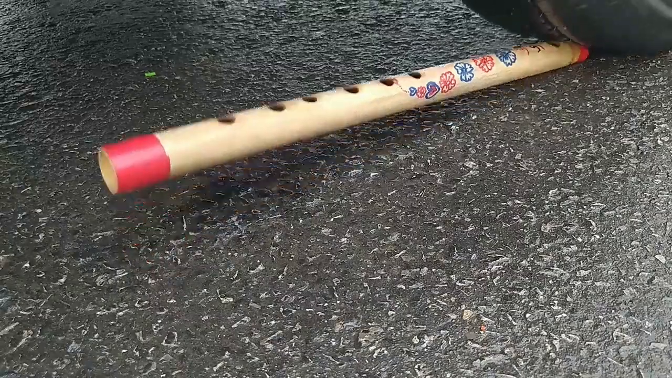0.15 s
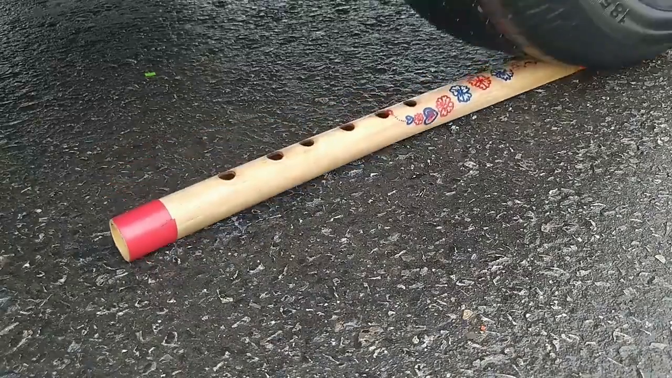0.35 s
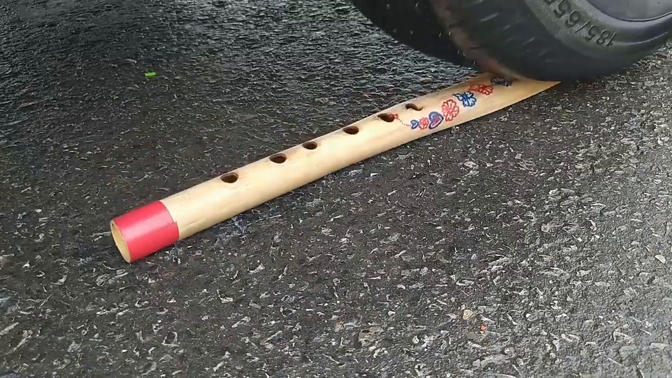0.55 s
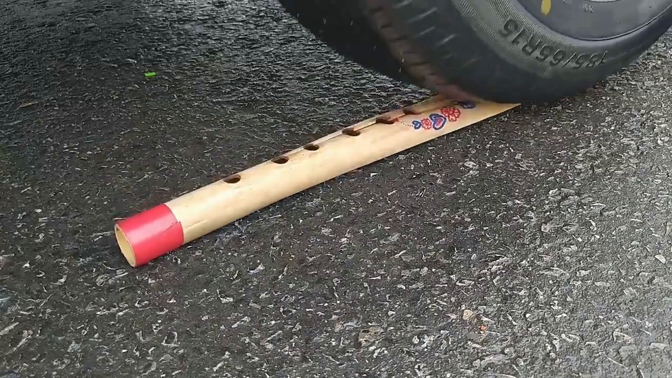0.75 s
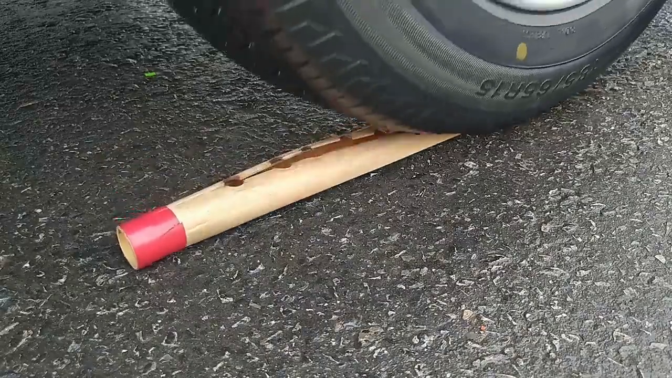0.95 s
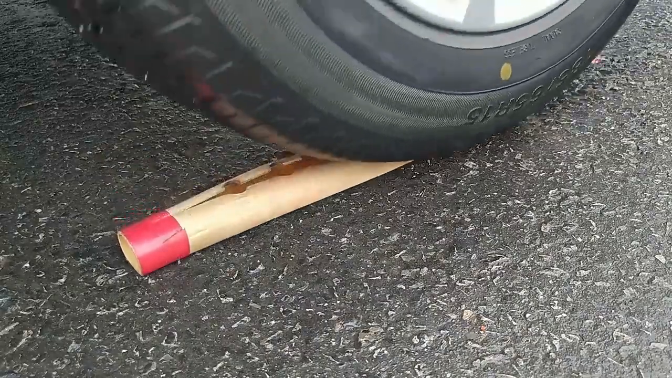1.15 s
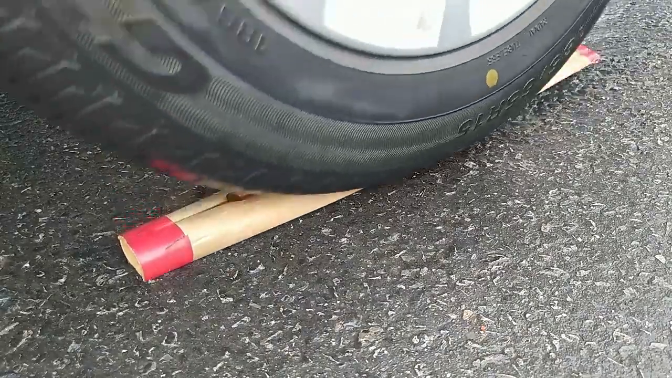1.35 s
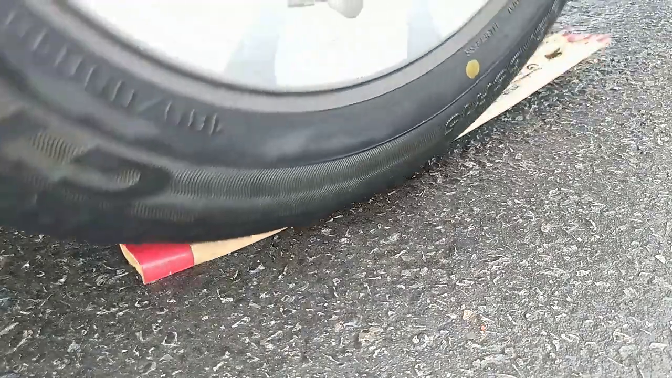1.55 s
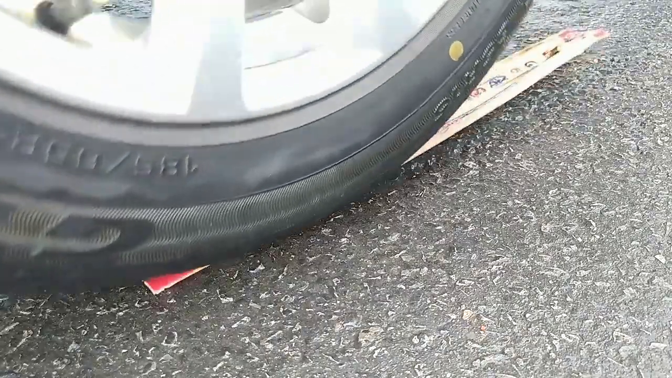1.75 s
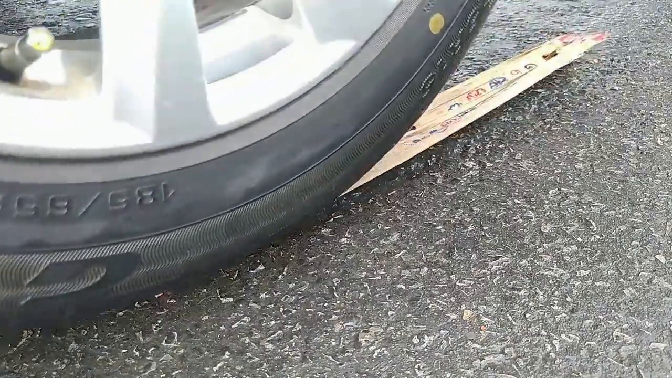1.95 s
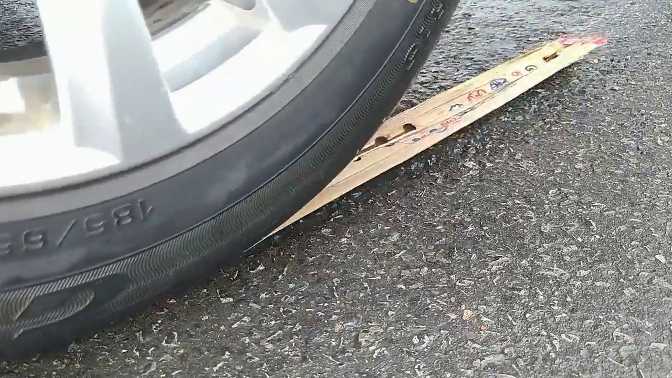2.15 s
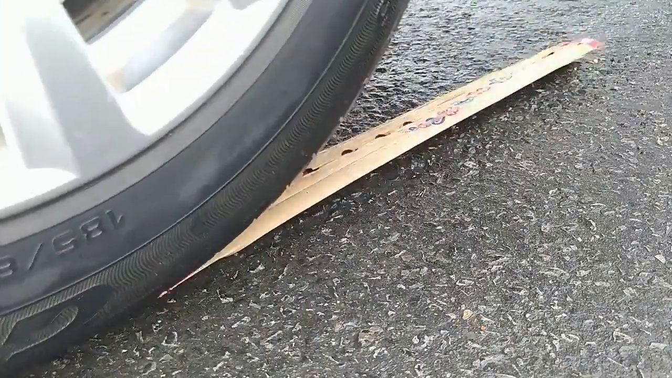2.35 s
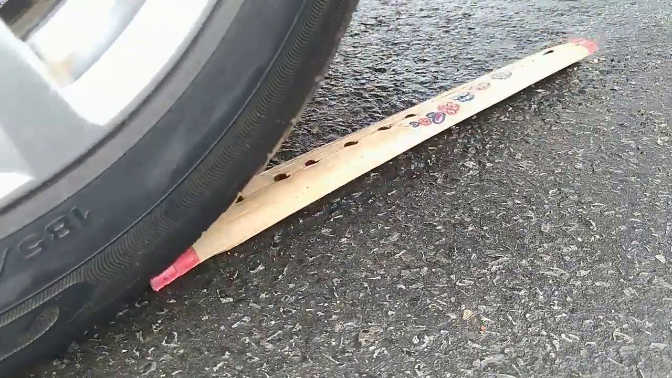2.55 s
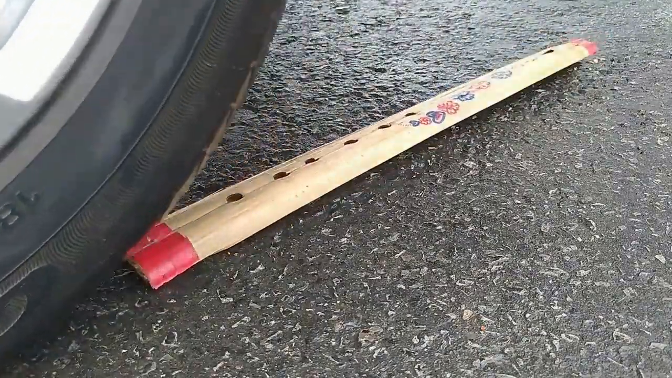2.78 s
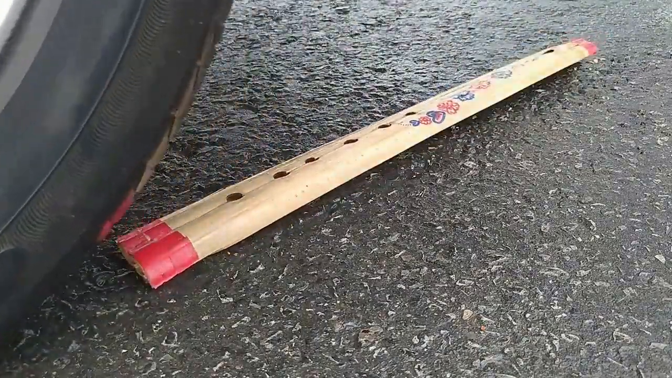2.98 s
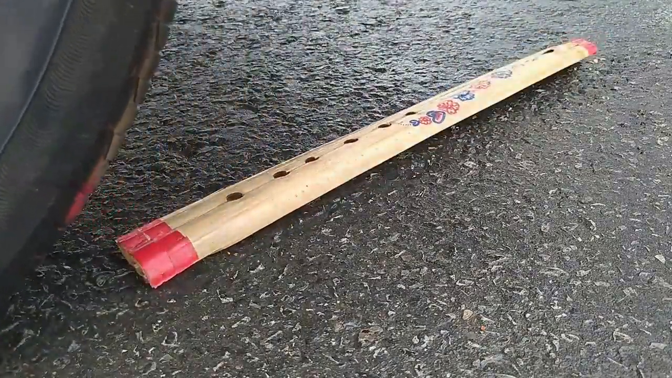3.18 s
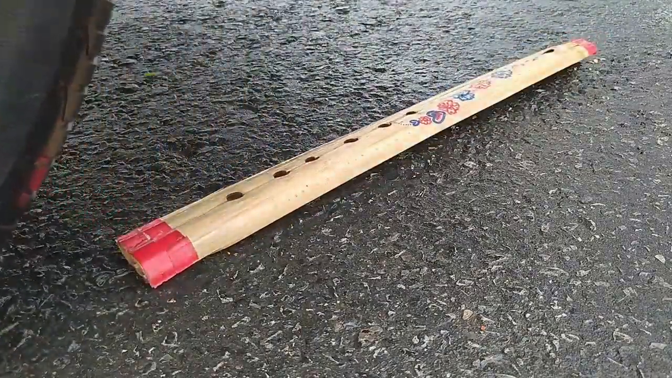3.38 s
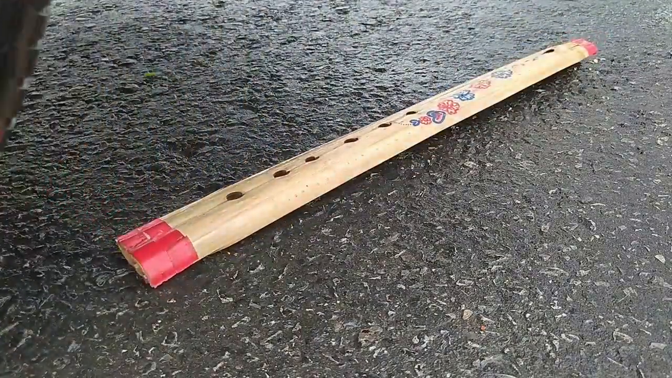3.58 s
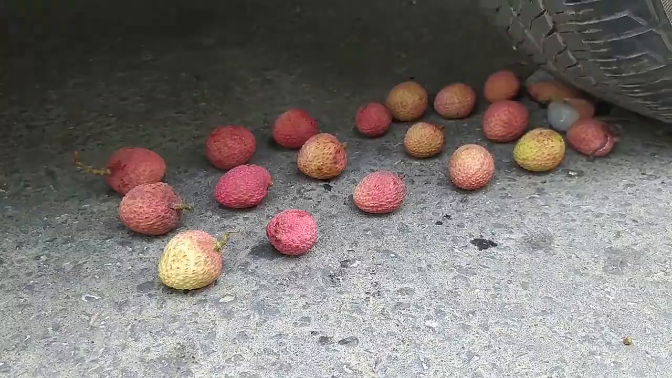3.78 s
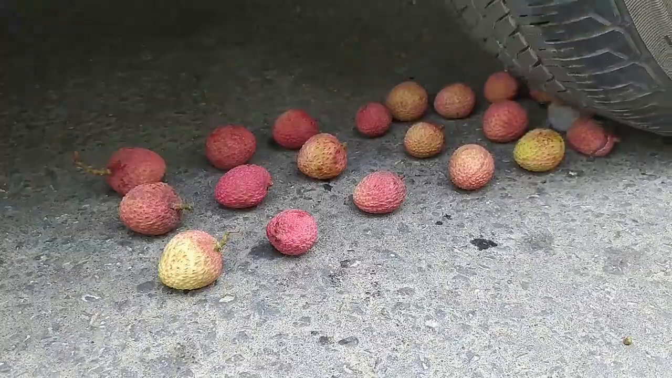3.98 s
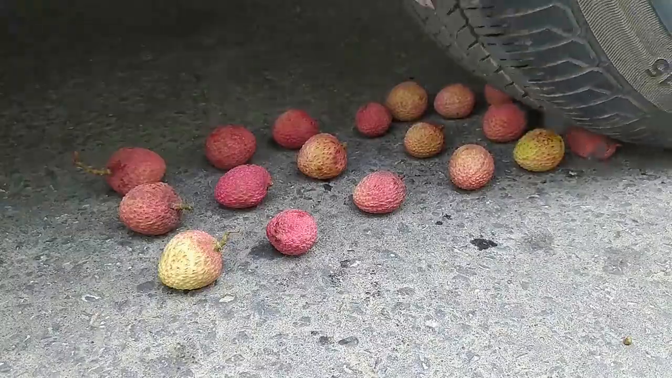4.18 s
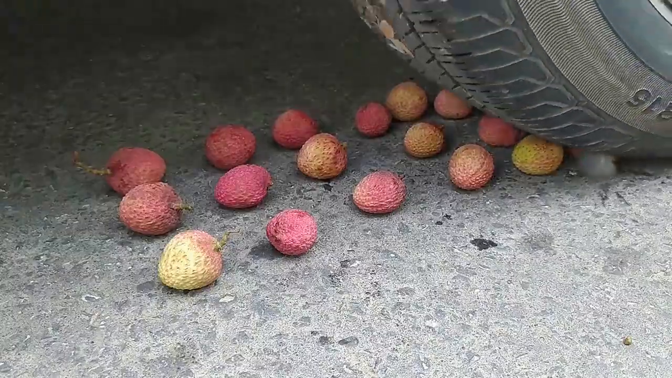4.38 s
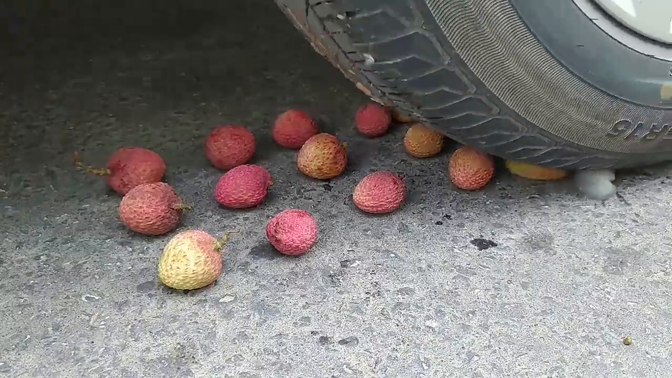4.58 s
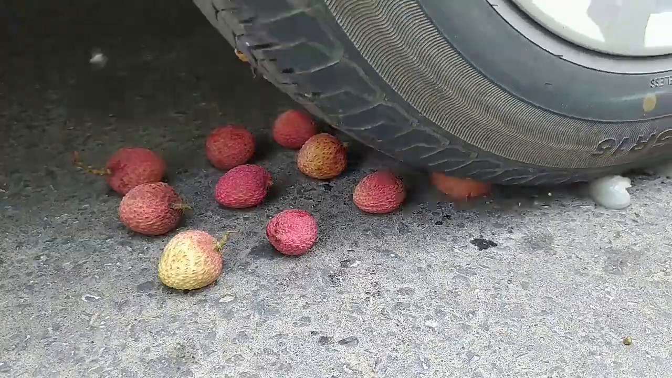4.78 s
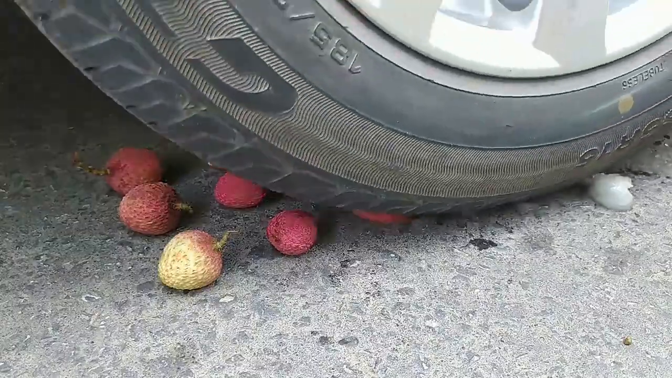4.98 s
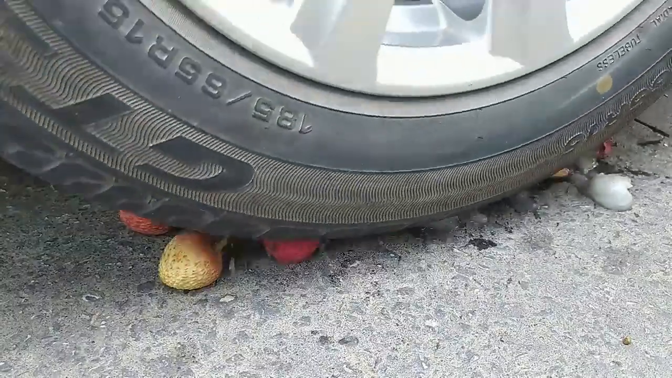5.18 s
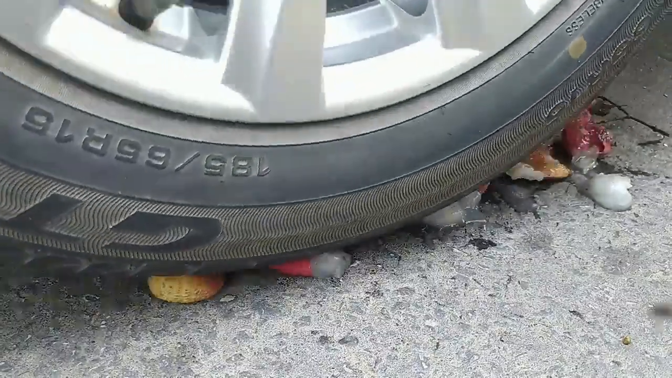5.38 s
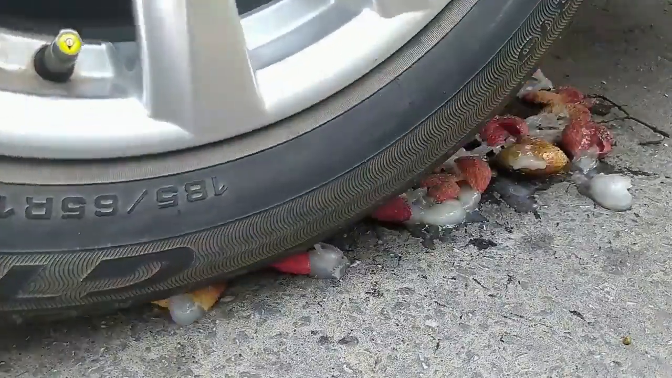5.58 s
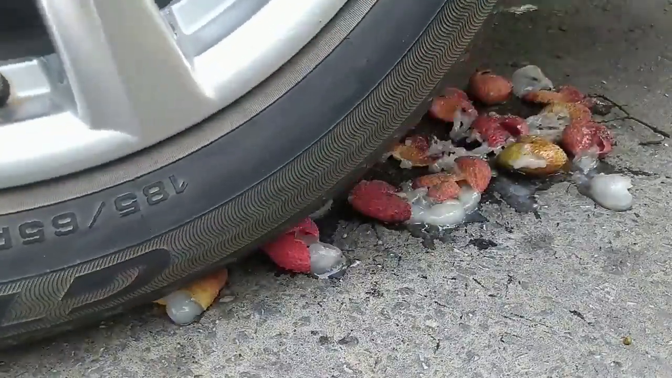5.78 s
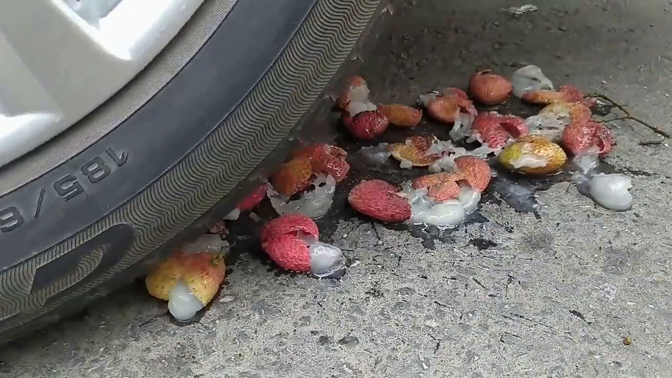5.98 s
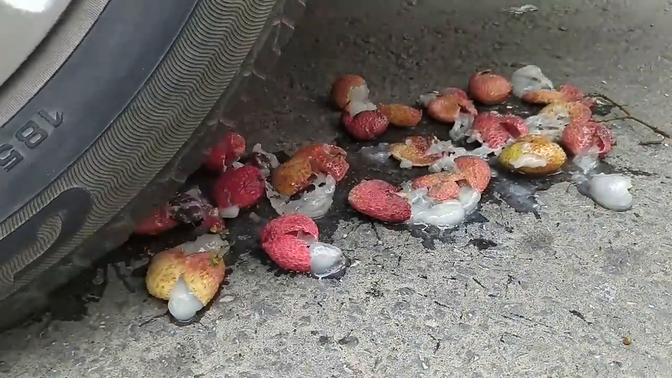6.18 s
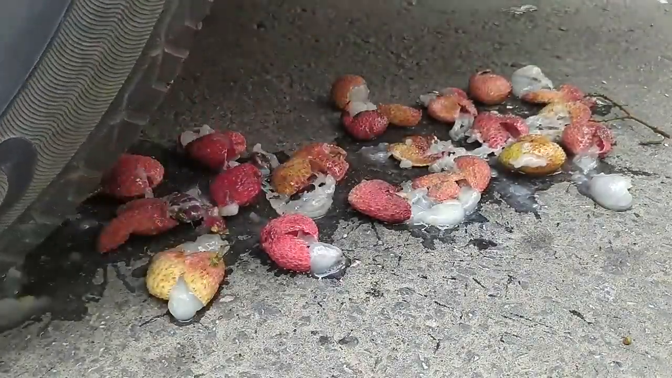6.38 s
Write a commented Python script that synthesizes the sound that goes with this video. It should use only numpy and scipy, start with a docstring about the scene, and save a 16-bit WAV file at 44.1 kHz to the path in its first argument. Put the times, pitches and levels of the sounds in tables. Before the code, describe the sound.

Outdoors, heard very close to the ground, with faint low car idle and thin high insect hiss. From about 0.07 s a tyre bites into a bamboo flute: sharp snaps, then a brief hollow rush sinking in pitch around 0.15-0.25 s. From 0.3 to 1.65 s dense, bright cracks, knocks and tearing fibres follow irregularly, with dull rubber shudders. Splits thin out until a strong one at 1.9 s, then small ticks and faint grit until 2.4 s. A lull follows, with distant gliding bird whistles and thin chirps from 2.85 to 3.75 s. At 3.8 s the background switches to a softer yard with lower insects. Lychees begin popping faintly at 4.05 s, growing to heavy juicy bursts, falling gulps, squelches and low tyre hum from 4.6 to 5.7 s, strongest near 5.55 and 5.7 s. Small wet crackles fade by 6.1 s, leaving quiet outdoor air.

```python
"""A car tyre creeps along a bamboo flute on asphalt: the tube splits in snaps, tearing and ringing knocks.
In the lull come grit, swept-sine birds and the insects, which are narrow bands of hiss.
After a cut to a yard the tyre rolls over lychees: shells pop, pulp gulps and squelches in falling
and rising tones, and the air in the tyre hums in damped modes. Dense echo taps stand for the
reflections between road and car body."""
import sys
import numpy as np
from scipy import signal
from scipy.fft import rfft, irfft, next_fast_len
from scipy.io import wavfile
from scipy.ndimage import uniform_filter1d

SR = 44100
rng = np.random.default_rng(int(sys.argv[2]) if len(sys.argv) > 2 else 0)


def waveform_to_disk(signal):
    """Save audio, clipped to [-1, 1], as 16-bit WAV at the path in sys.argv[1]."""
    frames = np.transpose(np.atleast_2d(signal))
    scaled = np.clip(frames, -1, 1) * 32767
    samples = np.round(scaled).astype(np.int16)
    wavfile.write(sys.argv[1], SR, samples)


N = 283563
T = np.arange(N) / SR  # s

CUT_S, CUT_FADE_S = 3.785, 0.006
STREET_DB, YARD_DB = -49, -53
DROP_RISE_S = 0.0034
RUBBER_RISE_S, RUBBER_FADE_S = 0.0034, 0.012  # the rubber's answer to each break
TEAR_SPREAD_DB = 3.5  # how unequal the small breaks are
FIBRE_WEIGHT_DB = -2.5
PING_DB, HUSK_PING_DB = 0, -5  # pings against scratches, fibres and husks
PAN_SPREAD_DB = 1.5
GULP_END_HZ, GULP_FALL_S, GULP_RISE_S, GULP_FADE_S = 228, 0.00636, 0.002, 0.0059
CEILING, EDGE_HZ = 0.9, 16000

# Levels are relative to their own source.
# Open air and idling car, street: hz, gain_db
STREET_COLOUR = [(20, -4), (70, 5), (200, -4.5), (310, -6), (430, -21), (550, -21), (1000, -31),
                 (4000, -23), (8000, -27), (12000, -37.5), (16000, -43.5)]
# Open air and idling car, yard: hz, gain_db
YARD_COLOUR = [(20, 6.5), (80, 2.5), (200, -0.5), (300, -8.5), (500, -10), (1000, -16.5), (2500, -18.5),
               (4200, -26.5), (6700, -19.5), (11000, -32), (14000, -31), (16000, -44.5)]
# Insects, street: centre_hz, width_hz, level_db
STREET_INSECT_BANDS = [(9780, 765, -51.5), (11380, 480, -54.5), (5530, 430, -61)]
# Insects, yard: centre_hz, width_hz, level_db
YARD_INSECT_BANDS = [(5180, 440, -60), (8050, 700, -61.5), (9600, 1100, -64)]
# Lower insect, dips, swells again, then fades: time_s, level_db
LOW_INSECT_LEVEL = [(3.78, -52), (4.05, -58), (4.6, -51.5), (6.4, -69)]
# Faint whirr of the car's fan: centre_hz, width_hz, level_db
FAN_BANDS = [(425.6, 14, -66)]
# Bird notes: start_s, length_s, start_hz, middle_hz, end_hz, level_db, waver_share_of_pitch
BIRD_NOTES = [(2.846, 0.078, 3690, 3440, 2620, -55, .009), (2.972, 0.058, 3790, 5050, 3800, -47.5, .007),
              (3.087, 0.032, 3930, 5100, 4400, -49, 0.0076), (3.133, 0.024, 4200, 4750, 4280, -55, .007),
              (3.174, 0.021, 4320, 4850, 4290, -53, .007), (3.211, 0.034, 4300, 5030, 4200, -54, .01),
              (3.127, 0.12, 3150, 3160, 3080, -59.5, .009), (3.236, 0.049, 2980, 2780, 2620, -56.5, 0.061),
              (3.306, 0.11, 4140, 5290, 4670, -53, 0.0084)]
# Thin paired chirps: start_s, level_db
BIRD_CHIRPS = [(2.865, -56), (3.044, -54.5), (3.079, -54), (3.266, -53.5), (3.299, -53.5), (3.479, -52),
               (3.52, -53), (3.698, -53.5), (3.73, -53)]
# Left-right likeness: hz, correlation
SIDE_LIKENESS = [(60, 0.36), (250, 1), (500, 0.18), (1000, 0.1), (2500, 0.042), (12000, 0.095)]
# Echo under the car: hz, t60_s
ECHO_DECAY = [(150, 0.097), (500, 0.072), (1500, 0.096), (6000, 0.096), (14000, 0.082)]
# Grit as the tread rolls off the flute: time_s, level_db
GRIT_LEVEL = [(1.9, -63), (2.1, -71), (2.4, -66), (2.6, -80), (2.9, -76), (3.3, -78)]
# Tube collapses, gap under the tread booms: time_s, level_db, resonance_hz
COLLAPSE_PATH = [(0.14, -33.5, 559.4), (.147, -26.5, 482), (0.163, -23, 378), (.178, -20, 260),
                 (0.192, -27, 175), (.215, -31, 161), (.26, -41, 151)]
# Rubber: hz, gain_db
RUBBER_COLOUR = [(40, -13.5), (75, 4), (110, -2), (160, 6), (260, 4.5), (350, -8), (520, -11),
                 (1200, -59.5)]
# Wheel drops as something gives way: start_s, level_db, fade_s
WHEEL_DROPS = [(.075, -38, 0.019), (0.151, -23.5, 0.082), (0.704, -28, 0.019), (1.275, -36, 0.075),
               (1.644, -28.5, 0.11), (1.913, -39, 0.017), (4.665, -35, 0.067), (4.834, -31.5, 0.049),
               (5.233, -31.5, 0.097), (5.543, -29, 0.028), (5.689, -29, 0.045)]
# Air in the tyre, street: hz, t60_s, level_db
STREET_CAVITY_MODES = [(263, 0.25, -33), (154, 0.33, -45.5), (438, 0.18, -42)]
# Air in the tyre, yard: hz, t60_s, level_db
YARD_CAVITY_MODES = [(219.5, .95, -24), (158.5, .42, -27.5)]
# Where the tread presses: time_s, left_over_right_db
TREAD_BALANCE = [(0, -0.5), (2.8, 0), (4.2, -0.5), (4.8, -0.5), (5.3, -2.5), (6.1, -2.5)]
# Shell bursts: start_s, snap_db, tear_db, tear_length_s, piece_weight_db, ring_hz, ring_db, ring_fade_s
SHELL_POPS = [(4.048, -45, -48, 0.031, 13, 1360, -43, 0.014),
              (4.088, -49, -58, 0.008, 6, 2070.0, -47, 0.003),
              (4.1164, -52, -40, 0.012, -12, 2130.0, -56.0, 0.012),
              (4.1509, -47, -37, 0.039, 5, 2180, -42.0, 0.012),
              (4.162, -49, -35, 0.0073, 10, 1750, -32, 0.0076),
              (4.186, -41, -24.5, 0.009, -2, 2200, -28, 0.004),
              (4.196, -21, -22, 0.0053, -11, 2050, -44, 0.005),
              (4.281, -36, -31.5, 0.011, 4, 800, -49, 0.011),
              (4.2986, -26.5, -37, 0.017, 10, 727, -21.5, 0.0045),
              (4.3351, -30, -35.5, 0.016, -37, 330.0, -40.0, 0.003),
              (4.3984, -28, -26, 0.0098, 19, 430, -41, 0.0044),
              (4.410, -29, -37, 0.004, -18, 1500, -46, 0.003),
              (4.528, -28.5, -27, 0.006, -5, 686, -32, 0.013),
              (4.5401, -44, -39, 0.0072, -2, 330, -38, 0.0027),
              (4.6163, -31, -50.0, 0.013, 4.0, 1110, -16, 0.0035),
              (4.6369, -31, -30, 0.02, 13, 610, -24, 0.005),
              (4.6564, -28.5, -16.5, 0.0067, -5, 378, -40, 0.011),
              (4.6645, -19.5, -16.5, 0.007, 8.5, 1825, -12, 0.0048),
              (4.751, -35, -44, 0.004, -12, 1500, -48, 0.003),
              (4.7731, -24, -28.5, 0.0076, 15, 440, -29, 0.0025),
              (4.7963, -27, -23.5, 0.0088, -3, 360.0, -28.0, 0.003),
              (4.8364, -26, -31, 0.0063, 4, 1670, -31, 0.003),
              (4.8657, -27, -35, 0.0087, -5, 337, -27, 0.011),
              (4.884, -24.5, -31, 0.0056, -4, 388, -28, 0.012),
              (4.899, -34, -31, 0.022, 4, 586, -23, 0.005), (4.929, -26, -29, 0.0081, -25, 970, -41, 0.011),
              (4.941, -22, -20.5, 0.0061, 1.5, 846, -23, 0.0033),
              (4.952, -36, -39, 0.0054, -13, 950, -52, 0.009),
              (4.9763, -20, -36, 0.046, 9, 873, -7.5, 0.0046),
              (5.0285, -34.5, -26.5, 0.0068, 15, 2750, -16, 0.0058),
              (5.0941, -17, -30.5, 0.012, 10.5, 1030, -18, 0.003),
              (5.108, -24, -33.5, 0.0073, 11, 1075, -45, 0.011),
              (5.1198, -21, -32.5, 0.053, -17, 860, -13, 0.0037),
              (5.127, -32, -39, 0.004, 16, 1670, -13.5, 0.0035),
              (5.15, -21.5, -34.5, 0.011, 14, 716, -24, 0.003),
              (5.181, -22, -22.5, 0.023, -2, 1464, -18, 0.018),
              (5.192, -21.5, -23, 0.0068, 4.5, 1220, -15, 0.004),
              (5.2095, -26, -34, 0.006, -8, 1390, -36, 0.011),
              (5.2349, -19, -18.5, 0.009, 11.5, 1160, -16, 0.003),
              (5.254, -29, -29.5, 0.014, 0, 750, -39, 0.012),
              (5.2756, -28, -32.5, 0.04, 0.5, 586, -17, 0.0056),
              (5.3205, -17.5, -22.5, 0.013, 9.5, 1220, -23, 0.0033),
              (5.370, -39, -41, 0.004, 8.5, 1700, -35, 0.003),
              (5.4054, -18.5, -30, 0.0099, 17, 1524, -6.5, 0.003),
              (5.443, -18.5, -23, 0.004, 10.5, 1530, -9.5, 0.0031),
              (5.495, -37, -37, 0.005, 3, 1500, -43, 0.0026),
              (5.512, -42.5, -37, 0.0069, 11, 1200, -37, 0.003),
              (5.5405, -13, -27, 0.0025, 6, 783, -12, 0.0052), (5.611, -38, -33, 0.02, 9, 940, -41, 0.012),
              (5.634, -23, -39, 0.018, 26, 834, -16, 0.0033),
              (5.6602, -28, -35, 0.0091, 12, 880, -22, 0.0033),
              (5.6839, -11, -22, 0.0035, 3.5, 3070, -30, 0.0022),
              (5.748, -38, -47, 0.005, 7, 2900, -39, 0.003),
              (5.788, -41.5, -52, 0.004, -14, 2700, -55, 0.003),
              (5.832, -38.5, -55, 0.005, -11, 2700, -55, 0.003),
              (5.918, -45.5, -52, 0.02, 4, 500.0, -41, 0.0034),
              (5.950, -46.5, -50, 0.007, 2, 2400, -43, 0.003),
              (5.9865, -51, -43.5, 0.061, 0.5, 3050, -39, 0.01),
              (6.0485, -38, -45, 0.017, 3, 414, -45, 0.01),
              (6.103, -57.5, -58.5, 0.009, 9, 930.0, -49, 0.0054)]
# Fruit: hz, gain_db
FRUIT_COLOUR = [(59, -30.5), (100, -12.5), (215, -10), (249, -6.5), (358, -2), (570, -13.5), (752, -6.5),
                (872, -9), (1060, -3), (2580, -5), (2800, -10.5), (5530, -10), (8280, 1), (13800, -16),
                (16000, -67)]
# Tint by weight of the piece: hz, gain_db at weight 0, gain_db per weight_db
FRUIT_WEIGHT_TINT = [(376, 0, 1.33), (1430, -4.5, 1.11), (4340, 2.5, 0.48), (9000, 2.9, 0.23),
                     (12900, -2, 0.11)]
# Crushing of pulp between pops: time_s, level_db
PULP_CRUSH = [(3.998, -79), (4.16, -56), (4.32, -41), (4.79, -41), (4.901, -44.5), (5.26, -36.5),
              (5.56, -43.5), (6.109, -60.5), (6.199, -75)]
# Wet pulp squeezed out under the tread: time_s, level_db
SQUELCH_LEVEL = [(4.1, -66), (4.55, -43.5), (4.7, -41.5), (5.03, -40), (5.15, -38.5), (5.27, -46),
                 (5.38, -39), (5.5, -48), (5.62, -40), (5.72, -45.5), (5.85, -58), (6.15, -70)]
# Juice: hz, gain_db
JUICE_COLOUR = [(200, -17.5), (400, -11), (900, 4), (1500, 1.5), (2300, 0), (4000, -7), (9000, -32)]
# Wet gulps of falling pitch: start_s, level_db, start_hz
PULP_GULPS = [(4.299, -28, 950), (4.399, -21.5, 1000), (4.638, -27, 925), (4.774, -24.5, 854),
              (4.866, -25, 650), (5.095, -19, 1310), (5.165, -32, 1100), (5.237, -16.5, 1020),
              (5.278, -14, 910), (5.406, -23, 1510), (5.444, -24, 1410), (5.542, -7, 1302),
              (5.635, -25, 1100), (5.686, -25, 910)]
# Bamboo splits: start_s, snap_db, tear_db, tear_length_s, piece_weight_db, ring_hz, ring_db, ring_fade_s
BAMBOO_SPLITS = [(0.0705, -12.5, -17, 0.0076, -2.5, 1870.0, -25.5, 0.003),
                 (0.108, -27, -32, 0.004, -17.5, 1470, -38, 0.012),
                 (0.1188, -13.5, -18.5, 0.0057, -2, 1475, -30, 0.012),
                 (0.142, -13, -11, 0.025, 6.5, 2600, -19, 0.019),
                 (0.2472, -19, -39.5, 0.025, -7, 2270, -30.5, 0.0057),
                 (0.278, -12.5, -34, 0.005, -34.5, 1590, -37, 0.014),
                 (0.2893, -26, -24.5, 0.031, -4, 1420, -29, 0.0033),
                 (0.3297, -6.5, -19.5, 0.021, -1, 2680, -20, 0.01),
                 (0.337, -18, -16, 0.0084, 18, 2060, -6, 0.0018),
                 (0.348, -21, -29, 0.005, 11, 910, -20.5, 0.004),
                 (0.375, -29, -25, 0.008, -13.5, 1820, -34, 0.012),
                 (0.389, -20, -31, 0.003, -24, 2400, -36, 0.003),
                 (0.396, -14.5, -9.5, 0.0057, -13.5, 1800, -29.5, 0.016),
                 (0.4043, -17, -20, 0.023, 7.5, 1750, -19, 0.0044),
                 (0.4368, -13, -17.5, 0.0075, 7, 1670, -5.5, 0.005),
                 (0.4899, -11, -14, 0.019, 8, 1837, -8.5, 0.0048),
                 (0.510, -20, -22, 0.005, 5, 845, -21.5, 0.0033),
                 (0.5287, -18, -24.5, 0.049, -5.5, 2600, -20, 0.0036),
                 (0.551, -15, -23, 0.003, -22, 2600, -36.5, 0.003),
                 (0.554, -31.5, -31.5, 0.023, 11, 860, -30.0, 0.0065),
                 (0.583, -14.5, -25.5, 0.003, -9.5, 2280, -32.5, 0.003),
                 (0.5889, -10, -13, 0.021, -2.5, 1125, -13, 0.0061),
                 (0.6108, -22, -9.5, 0.0078, -2, 2030, -17.5, 0.018),
                 (0.6278, -26.0, -13, 0.018, -1, 1870, -21, 0.014),
                 (0.641, -17, -19, 0.0088, -7, 2610.0, -16.5, 0.011),
                 (0.655, -9, -18.5, 0.015, -4.5, 2510, -22, 0.008),
                 (0.666, -17, -24.5, 0.012, 3.5, 1080, -19.5, 0.0062),
                 (0.7041, -10, -11.5, 0.018, 8.5, 1810, -11.5, 0.007),
                 (0.7477, -25.0, -13.5, 0.013, -10, 1400, -29.5, 0.014),
                 (0.7633, -14.5, -19, 0.0085, -1, 1360, -15.5, 0.0036),
                 (0.7886, -13.5, -11.5, 0.005, 6, 1666, -15.5, 0.016),
                 (0.797, -15.5, -15, 0.016, 3, 1600, -16.5, 0.0072),
                 (0.835, -23.5, -27, 0.003, -17.5, 2500, -35, 0.003),
                 (0.843, -16, -22.5, 0.022, -7, 2220, -21.5, 0.013),
                 (0.854, -15, -19, 0.0075, 4.5, 1870, -9, 0.0021),
                 (0.885, -23, -27, 0.005, -15, 1920, -24.5, 0.0028),
                 (0.9008, -15, -16.5, 0.0072, -8, 2820, -32.5, 0.012),
                 (0.922, -27, -16.5, 0.0051, 2, 1950, -20.5, 0.0022),
                 (0.9705, -12, -15, 0.0042, -7.5, 2210, -22, 0.0017),
                 (0.9875, -20.5, -13.5, 0.0068, -1.5, 2300, -19, 0.0026),
                 (1.0029, -26, -14, 0.0065, 5.5, 1340, -25, 0.015),
                 (1.0259, -12.5, -28, 0.023, 7.5, 1220, -9.5, 0.0057),
                 (1.0565, -27, -13, 0.019, 1, 1337, -20, 0.01),
                 (1.0763, -13.5, -20.5, 0.014, 1.5, 1210, -12, 0.005),
                 (1.1102, -24.5, -11, 0.0093, -0.5, 2740, -17.5, 0.0038),
                 (1.1343, -19, -18, 0.014, 3.5, 2750, -19, 0.0065),
                 (1.161, -22.5, -25, 0.011, -7.5, 2460.0, -27.0, 0.005),
                 (1.2018, -12, -22, 0.025, -6.5, 2520, -24, 0.015),
                 (1.219, -14.0, -14, 0.018, -1, 2300, -13, 0.0035),
                 (1.2731, -6.5, -16, 0.019, 1.5, 2970.0, -13, 0.0059),
                 (1.297, -25, -15.5, 0.0054, 7.5, 1330.0, -17.5, 0.011),
                 (1.304, -10.5, -21, 0.023, 6, 1096, -7, 0.0038),
                 (1.323, -18, -21.5, 0.008, -2, 1070.0, -26, 0.0078),
                 (1.335, -18.5, -23.5, 0.007, -8.5, 2490, -22.0, 0.005),
                 (1.3496, -16.5, -21.5, 0.0053, 1.5, 1120, -13.5, 0.0035),
                 (1.3565, -20, -31, 0.003, -11, 2700, -30, 0.003),
                 (1.3703, -11.5, -24, 0.0078, 13, 1700, -11.5, 0.0035),
                 (1.381, -19, -31.5, 0.003, -1, 2900, -27.5, 0.003),
                 (1.391, -17, -19, 0.0045, -0.5, 1190.0, -12.5, 0.0033),
                 (1.4073, -15, -9.5, 0.0029, -18.5, 2970.0, -28.5, 0.012),
                 (1.415, -18.5, -21.5, 0.0048, -4, 2970.0, -26, 0.011),
                 (1.4321, -18, -20, 0.023, 0.5, 1450.0, -18, 0.0067),
                 (1.4499, -8, -13, 0.0031, -7, 1350, -12, 0.003),
                 (1.466, -22.5, -17.5, 0.01, -9, 2800, -23, 0.0024),
                 (1.4976, -14.5, -23.5, 0.017, -3.5, 1930, -20.5, 0.0025),
                 (1.519, -27, -22, 0.0062, 1.5, 2640.0, -34.5, 0.012),
                 (1.528, -20, -26.0, 0.0089, 1, 2610.0, -27, 0.008),
                 (1.548, -14.5, -23.5, 0.017, -6, 2770.0, -28.5, 0.019),
                 (1.571, -10, -29.5, 0.035, -4.5, 2580, -20.5, 0.0015),
                 (1.6432, -8.5, -10.5, 0.01, 4.5, 1080, -20, 0.0015),
                 (1.6938, -18, -23.5, 0.0089, -3.5, 3000.0, -21, 0.0032),
                 (1.7107, -13, -19.5, 0.013, 1.5, 1188, -22, 0.0074),
                 (1.7515, -21, -45.0, 0.004, -17, 2900.0, -44.5, 0.012),
                 (1.7579, -15.5, -34, 0.0062, -19.5, 2720, -28, 0.003),
                 (1.7903, -10.5, -12.5, 0.0018, 8, 1166, -14.5, 0.0025),
                 (1.8016, -17, -20.5, 0.0082, -5, 2730.0, -24, 0.004),
                 (1.8397, -22, -52.0, 0.008, -7, 1290, -30, 0.0027),
                 (1.8821, -11, -52, 0.004, -0.5, 1295, -15.5, 0.0031),
                 (1.9111, -9, -29, 0.028, 0, 1290, -6.5, 0.0025),
                 (2.012, -35, -53, 0.005, -15, 1600, -61, 0.012),
                 (2.0332, -21, -52, 0.01, -9, 1210, -38, 0.0042),
                 (2.1205, -17, -38, 0.005, -20, 2860.0, -47, 0.0025),
                 (2.1935, -36, -39, 0.0035, -1, 1540, -40, 0.0033),
                 (2.2206, -32, -52, 0.014, -2, 1380, -39, 0.005),
                 (2.265, -39, -48, 0.0089, -9, 1910.0, -56.0, 0.003),
                 (2.3055, -33.5, -50, 0.0089, -3.5, 1110, -52, 0.004),
                 (2.3095, -32.5, -52, 0.0068, -7, 2830, -54, 0.003),
                 (2.322, -38, -55, 0.005, -21, 2200, -56, 0.003),
                 (2.362, -44, -55, 0.004, -25, 2580, -60, 0.0027),
                 (2.406, -34, -44, 0.006, -17, 1430.0, -61.0, 0.014),
                 (2.4135, -34, -52, 0.003, -20, 2600, -62, 0.003),
                 (2.4188, -31.5, -41.5, 0.013, -7, 1070, -38, 0.005),
                 (2.8092, -49, -45, 0.022, -2, 1290.0, -52, 0.007),
                 (3.4052, -38, -45, 0.018, -13, 2990, -50, 0.0031)]
# Bamboo: hz, gain_db
BAMBOO_COLOUR = [(59, -47), (100, -13), (163, -11), (224, -5.5), (260, -4.5), (295, -4.5), (595, -1.5),
                 (950, -1), (1330, 1), (2750, 0.5), (4020, -6.5), (5420, -6.5), (8110, -3), (9610, 3.5),
                 (16000, -24)]
# Tint by weight of the piece: hz, gain_db at weight 0, gain_db per weight_db
BAMBOO_WEIGHT_TINT = [(375, -1.5, 0.94), (1550, -2.5, 1), (4395, .5, 0.66), (9000, 1.5, 0)]
# Crushing of fibres between splits: time_s, level_db
FIBRE_CRUSH = [(0, -26), (.06, -69), (.13, -25), (.25, -29), (.42, -34), (.65, -23), (1.38, -22.5),
               (1.56, -28.5), (1.72, -48), (2.5, -55)]
# Tube resonances: hz, width_hz, gain_db
TUBE_MODES = [(1340, 30, -17), (2230, 37, -11), (4450, 50, -2.5), (5880, 99, -13), (6730, 74, -8.5),
              (9700, 73, -9)]


def amp(db):
    """Decibels to gain."""
    return 10 ** (np.asarray(db) / 20)


def unit(x):
    """Scales to rms 1."""
    return x / np.sqrt(np.mean(x ** 2) + 1e-20)


def read(points, hz):
    """Reads a table on a log-frequency axis."""
    f, value = np.transpose(points)
    return np.interp(np.log(hz + 1), np.log(f + 1), value)


def follow(curve, s):
    """The value of a control curve at time s."""
    return np.interp(s, *np.transpose(curve))


def level(rows):
    """A dB column as a gain over time, silent outside its span."""
    rows = np.array(rows)
    return amp(np.interp(T, rows[:, 0], rows[:, 1], left=-150, right=-150))


def swell(s, rise_s, fade_s):
    """An envelope that rises at time s and dies away."""
    age = np.maximum(T - s, 0)
    return (1 - np.exp(-age / rise_s)) * np.exp(-age / fade_s)


def drift(rate_hz):
    """Slow chance of rms 1."""
    knots = np.arange(0, T[-1] + 1, 1 / (2 * rate_hz))
    return unit(np.interp(T, knots, rng.standard_normal(4096)[:len(knots)]))


def add(mix, s, sound):
    """Mixes a stereo sound in at time s."""
    part = mix[:, max(round(s * SR), 0):][:, :sound.shape[-1]]
    part += sound[..., :part.shape[-1]]


def placed(x):
    """The left-right balance follows the tread across the road."""
    return x * amp(follow(TREAD_BALANCE, T) * np.array([[.5], [-.5]]))


def band(x, lo_hz, hi_hz):
    """Causal band-pass."""
    sos = signal.butter(2, [lo_hz, min(hi_hz, .49 * SR)], "band", fs=SR, output="sos")
    return signal.sosfilt(sos, x)


def minimum_phase(gain_db):
    """Causal (minimum-phase) frequency response of a gain curve over all FFT bins."""
    log_gain = np.log(amp(np.maximum(gain_db, -100)))
    return np.exp(np.conj(signal.hilbert(log_gain)))


def colour(x, db_at, size=2048):
    """Causal filter with the gain db_at(Hz); crossfeed sets the left-right correlation."""
    hz = abs(np.fft.fftfreq(size, 1 / SR))
    response = minimum_phase(db_at(hz))
    angle = np.arcsin(np.clip(read(SIDE_LIKENESS, hz), 0, 1)) / 2
    own = np.fft.ifft(response * np.cos(angle)).real[None, :size // 2]
    cross = np.fft.ifft(response * np.sin(angle)).real[None, :size // 2]
    mixed = signal.fftconvolve(x, own, axes=1) + signal.fftconvolve(x[::-1], cross, axes=1)
    return mixed[:, :x.shape[1]]


def noise(db_at):
    """Steady stereo noise of a given colour."""
    return unit(colour(rng.standard_normal((2, N)), db_at, size=8192))


def echo(x, size=16384):
    """Dense reflections between road and car body, each band dying at its own speed."""
    taps = rng.standard_normal((2, size)) * (rng.random((2, size)) < 3000 / SR)
    taps = taps * (T[:size] > .003)
    hz, t, z = signal.stft(taps, SR, nperseg=256)
    decay = amp(-60 * t / read(ECHO_DECAY, hz)[:, None])
    tail = signal.istft(z * decay, SR, nperseg=256)[1]
    tail = tail / np.linalg.norm(tail, axis=1, keepdims=True)
    return signal.fftconvolve(x, tail, axes=1)[:, :N]


def drone(rows):
    """Narrow bands of slightly wavering hiss: an insect chorus or a fan."""
    def db_at(hz):
        power = sum(amp(db) ** 2 / width * np.exp(-abs((hz - centre) / width) ** 2.5)
                    for centre, width, db in rows)
        return 10 * np.log10(power / power.max() + 1e-20)
    total = np.linalg.norm(amp([db for *_, db in rows]))
    return total * amp(0.54 * drift(12)) * noise(db_at)


def outdoors():
    """Coloured noise and insect bands: the street, then the yard."""
    street = amp(STREET_DB + 1.3 * drift(8.8)) * noise(lambda hz: read(STREET_COLOUR, hz))
    street = street + drone(STREET_INSECT_BANDS) + drone(FAN_BANDS)
    yard = amp(YARD_DB) * noise(lambda hz: read(YARD_COLOUR, hz)) + drone(YARD_INSECT_BANDS)
    yard = yard + level(LOW_INSECT_LEVEL) * drone([(3220, 1280, 0)])
    moved = np.clip((T - CUT_S) / CUT_FADE_S + .5, 0, 1)
    return (1 - moved) * street + moved * yard


def note(length_s, start_hz, middle_hz, end_hz, waver):
    """One bird note: a sine through three pitches, louder where higher."""
    u = np.linspace(0, 1, int(length_s * SR))
    hz = np.polyval(np.polyfit([0, .5, 1], [start_hz, middle_hz, end_hz], 2), u)
    hz = hz * (1 + waver * unit(uniform_filter1d(rng.standard_normal(len(u)), 60)))
    envelope = np.sqrt(abs(np.sin(np.pi * u))) * (hz / hz.max()) ** 2
    return unit(envelope * np.sin(2 * np.pi * np.cumsum(hz) / SR)) * np.ones((2, 1))


def birds():
    """Gliding whistles and thin, buzzy chirps some way off, blurred by the echo."""
    out = np.zeros((2, N))
    for s, length_s, start_hz, middle_hz, end_hz, db, waver in BIRD_NOTES:
        add(out, s, amp(db) * note(length_s, start_hz, middle_hz, end_hz, waver))
    for s, db in BIRD_CHIRPS:
        add(out, s, amp(db) * note(0.0207, 6340, 5950, 5780, waver=0.03))
    out = out * amp(2.5 * drift(130))
    return .8 * out + .3 * echo(out)


def fractures(size, per_s, spread_db):
    """Tiny breaks at random moments, a few much larger, each a brief scratch over a faint hiss."""
    sizes = amp(spread_db * np.minimum(rng.exponential(1, size), 4))
    clicks = (rng.random(size) < per_s / SR) * sizes
    power = signal.lfilter([1], [1, -np.exp(-1 / (0.0008 * SR))], clicks ** 2)
    return np.sqrt(power + 0.026) * rng.standard_normal(size)


def grit():
    """Loose grains of asphalt crunch faintly under the rubber, as band-passed scratches."""
    grinding = np.array([fractures(N, 300, TEAR_SPREAD_DB) for _ in range(2)])
    return level(GRIT_LEVEL) * unit(band(grinding + .5 * grinding[::-1], 531, 1600))


def collapse():
    """A rough rush of air through two resonances that sink as the tread comes down."""
    s, _, hz = np.transpose(COLLAPSE_PATH)
    turns = np.cumsum(np.interp(T, s, hz)) / SR

    def rush(ratio):
        flutter = .6 + drift(240) + 1j * drift(270)
        tone = np.exp(2j * np.pi * ratio * turns)
        return unit((tone * flutter / (abs(flutter) + 1)).real)
    return level(COLLAPSE_PATH) * (rush(1) + amp(-22) * rush(2.3))


def push(x):
    """A slow swell of pressure follows each strong crack: the low band of its power."""
    return band(band((x ** 2).mean(0), 4.5, 38), 5.6, 59.3)


def steadied(x):
    """Evens out the chance swells of a noise, so that it rings rather than rumbles."""
    envelope = abs(signal.hilbert(x, next_fast_len(N))[:, :N])
    size = np.sqrt((envelope ** 2).mean(0))
    return unit(x / (size + .5 * size.mean()))


def kicks(breaks, db_per_weight):
    """The jolt that each break gives the tyre, by its loudness and weight."""
    out = np.zeros(N)
    for s, snap_db, tear_db, _, weight_db, *_ in breaks:
        out[round(s * SR)] = np.hypot(amp(snap_db), .5 * amp(tear_db)) * amp(db_per_weight * weight_db)
    return out


def shudder(breaks, crush, jolt_db, load_db):
    """How much the rubber shakes: steadily with the crushing, briefly after each break."""
    answer = swell(0, RUBBER_RISE_S, RUBBER_FADE_S)[:SR // 2]
    jolts = signal.fftconvolve(kicks(breaks, db_per_weight=0.5), answer)[:N]
    return amp(jolt_db) * jolts + amp(load_db) * level(crush)


def cavity(jolts, modes):
    """Each jolt rings the damped modes of the air in the tyre."""
    t = T[:SR]
    ring = sum(amp(db - 60 * t / t60_s) * np.sin(2 * np.pi * hz * t) for hz, t60_s, db in modes)
    return signal.fftconvolve(jolts, ring)[:N]


def hum(drop_db, pop_db):
    """Bamboo rings the tyre with every split; fruit does so with its pops and the wheel drops."""
    landings = np.zeros(N)
    for s, db, fade_s in WHEEL_DROPS:
        landings[round(s * SR)] = amp(db + drop_db) * (s > CUT_S) * min(fade_s / 0.053, 1)
    pops = amp(pop_db) * kicks(SHELL_POPS, db_per_weight=1.1057)
    street = cavity(kicks(BAMBOO_SPLITS, db_per_weight=-0.15), STREET_CAVITY_MODES)
    return street + cavity(landings + pops, YARD_CAVITY_MODES)


def tyre():
    """The rubber shudders under the load as shaped noise, and the air inside hums."""
    shaking = shudder(BAMBOO_SPLITS, FIBRE_CRUSH, jolt_db=-31, load_db=-30)
    shaking = shaking + shudder(SHELL_POPS, PULP_CRUSH, jolt_db=-24, load_db=-7)
    shaking = shaking + sum(amp(db) * swell(s, DROP_RISE_S, fade_s) for s, db, fade_s in WHEEL_DROPS)
    rubber = steadied(noise(lambda hz: read(RUBBER_COLOUR, hz)))
    return shaking * rubber + hum(drop_db=17, pop_db=-17.5)


def pieces(db_at, ripple_db, width_hz, size=1024):
    """The ring of one broken piece: chance resonances on its colour, partly different to each side."""
    hz = abs(np.fft.fftfreq(size, 1 / SR))
    knots = np.arange(100) * max(width_hz, 230)
    shared, *sides = (np.interp(hz, knots, row) for row in rng.standard_normal((3, 100)))
    depth_db = ripple_db * np.minimum(hz / 2500, 1)  # small pieces have no low modes
    gain_db = db_at(hz) + depth_db * (.75 * shared + .65 * np.array(sides))
    return np.fft.ifft(minimum_phase(gain_db)).real[:, :size // 2]


def knock(ring_hz, ring_s, sweep, under_db, over_db, size=4096):
    """The freed piece rings, falling in pitch, with a brief overtone and the deeper ring of its hollow."""
    t = T[:size]
    apart = .7 * rng.standard_normal() * min(ring_hz / 1500, 1) * np.array([[.5], [-.5]])  # rad

    def ring(hz, fade_s, fall_s):
        turns = np.cumsum(hz * (1 + sweep * np.exp(-t / fall_s))) / SR
        return np.exp(-t / fade_s) * np.sin(2 * np.pi * turns + apart)
    deep = ring(.47 * ring_hz, ring_s + .005, .009)
    high = ring(rng.uniform(1.5, 2.4) * ring_hz, .6 * ring_s, .003)
    rings = ring(ring_hz, ring_s, .003) + amp(under_db) * deep + amp(over_db) * high
    return (1 - np.exp(-t / .00056)) * rings


def cracks(rows, spectrum, weighting, tear_per_s, body_db, body_octaves, knock_db, under_db, over_db,
           sweep, lag_s, size=6144):
    """Each break is a snap, a knock and a dying run of small tears, ringing in the piece that breaks."""
    out, t = np.zeros((2, N)), np.arange(size) / SR
    for s, snap_db, tear_db, length_s, weight_db, ring_hz, ring_db, ring_s in rows:
        def tint(hz, piece_db):
            body = body_db / (1 + (np.log2((hz + 1) / ring_hz) / body_octaves) ** 2)
            tilt = [(f, db + share * piece_db) for f, db, share in weighting]
            return read(spectrum, hz) + read(tilt, hz) + body

        def radiate(force, piece_db):
            piece = pieces(lambda hz: tint(hz, piece_db), ripple_db=4.8, width_hz=260)
            left, right = signal.fftconvolve(force[None], piece, axes=1)[:, :size]
            # the pieces lie in different directions
            lag = round((lag_s + 0.00013 * rng.standard_normal()) * SR)
            return unit(np.array([np.roll(left, max(lag, 0)), np.roll(right, max(-lag, 0))]))

        # partly whitened: a snap fills all pitches
        burst = rfft(rng.standard_normal(size) * np.exp(-t / .0009) * (1 - np.exp(-t / .0003)))
        burst = burst / (abs(burst) + 0.15 * abs(burst).mean()) ** 0.2
        burst = irfft(burst, size) * (t < .02)
        snap = radiate(burst, weight_db + 2) * np.sqrt(.0045 / t[-1])

        length_s = max(length_s, .002)
        fading = np.exp(-t / length_s) * (1 - np.exp(-(t / 0.0015) ** 2))
        # a longer tear is of thinner, lighter fibres
        fibre_db = weight_db + FIBRE_WEIGHT_DB * min(length_s / 0.014, 1)
        tear = radiate(fractures(size, tear_per_s, TEAR_SPREAD_DB) * fading, fibre_db)
        tear = tear * np.sqrt(length_s / t[-1])

        pan_db = follow(TREAD_BALANCE, s) + PAN_SPREAD_DB * rng.standard_normal()
        sides = amp([[pan_db / 2], [-pan_db / 2]])
        add(out, s, sides * (amp(snap_db) * snap + amp(tear_db) * tear))
        add(out, s, sides * amp(ring_db + knock_db) * knock(ring_hz, ring_s, sweep, under_db, over_db))
    return out


def small_breaks(crush, snap_db, tear_db, ring_db, length_s, ring_s, low_hz, high_hz, weight_db,
                 spread_db, count):
    """Lesser breaks come at chance moments, as strong as the crushing is hard."""
    when, size, pitch, weight = rng.random((count, 4)).T
    s = crush[0][0] + (crush[-1][0] - crush[0][0]) * (np.arange(count) + when) / count
    db = follow(crush, s) + spread_db * (2 * size - 1)
    weights_db = weight_db + spread_db * (2 * weight - 1)
    hz = low_hz * (high_hz / low_hz) ** pitch
    return np.column_stack([s, db + snap_db, db + tear_db, np.full(count, length_s), weights_db,
                            hz, db + ring_db, np.full(count, ring_s)])


def grains(per_s, cycles, glide, count=36):
    """Brief pings of many pitches, each at its own random moments and place."""
    out, t = np.zeros((2, N + 2048)), T[:512]
    for hz in np.geomspace(420, 10800, count) * rng.uniform(.95, 1.05, count):
        tone = np.sin(2 * np.pi * hz * t * (1 + glide * t))
        ping = hz * np.exp(-t * hz / cycles) * tone * (1 - t / t[-1])
        when, size, *delays = rng.random((int(per_s * T[-1] / count), 4)).T
        gain = amp(-TEAR_SPREAD_DB * np.log(size + .02))
        pings = np.outer(gain, ping).ravel()
        for side, delay in zip(out, delays):
            start = (when * N + 16 * delay).astype(int)  # up to 16 samples apart
            index = (start[:, None] + np.arange(len(t))).ravel()
            side += np.bincount(index, pings, len(side))
    return out[:, :N]


def crackle(crush, spectrum, voices, ping_db, low_db, high_db):
    """Countless small breaks under the advancing tread: clumps of scratches mixed with pings."""
    scratches = np.array([fractures(N, 500, TEAR_SPREAD_DB) for _ in range(2)])
    mix = unit(scratches) + amp(ping_db) * unit(voices)
    mix = colour(mix, lambda hz: read(spectrum, hz))
    low, high = unit(band(mix, 352, 4100)), unit(band(mix, 3520, 18980))
    clumps = unit(amp(2.2 * drift(70)))
    return level(crush) * clumps * (amp(low_db) * low + amp(high_db) * high)


def gulps():
    """Pulp shoots out of a bursting fruit; the pitch drops as the opening widens."""
    out, t = np.zeros((2, N)), T[:4096]
    envelope = swell(0, GULP_RISE_S, GULP_FADE_S)[:len(t)]
    for s, db, start_hz in PULP_GULPS:
        hz = GULP_END_HZ + (start_hz - GULP_END_HZ) * np.exp(-t / GULP_FALL_S)
        hz = hz * (1 + .12 * unit(uniform_filter1d(rng.standard_normal(len(t)), 60)))
        add(out, s, amp(db) * envelope * np.sin(2 * np.pi * np.cumsum(hz) / SR))
    return out


def squelch():
    """Juice spurts in clumps of small rising bubbles, over the dull slosh of the mashed pulp."""
    bubbles = colour(grains(per_s=2600, cycles=5, glide=14), lambda hz: read(JUICE_COLOUR, hz))
    spurts = unit(amp(2.2 * drift(45)) * bubbles)
    slosh = unit(band(rng.standard_normal(N), 150, 520)) * amp(2 * drift(30))
    return level(SQUELCH_LEVEL) * (spurts + amp(-6.5) * slosh)


def lychees():
    """The fruit: bursting shells, crumbling husks and squelching pulp."""
    husks = small_breaks(PULP_CRUSH, snap_db=2, tear_db=-2, ring_db=2, length_s=.012, ring_s=.004,
                         low_hz=450, high_hz=1700, weight_db=4, spread_db=3, count=24)
    breaks = cracks([*SHELL_POPS, *husks], FRUIT_COLOUR, FRUIT_WEIGHT_TINT, tear_per_s=1200,
                    body_db=12, body_octaves=1, knock_db=-5, under_db=-13.5, over_db=-24,
                    sweep=0.438, lag_s=.00012)
    fizz = grains(per_s=1500, cycles=3, glide=8)
    crumbling = crackle(PULP_CRUSH, FRUIT_COLOUR, fizz, HUSK_PING_DB, low_db=-6, high_db=2)
    return breaks + placed(gulps() + squelch() + crumbling)


def tube(x):
    """The hollow tube adds its own resonances to whatever breaks in it."""
    return x + sum(amp(db) * signal.lfilter(*signal.iirpeak(hz, hz / width_hz, fs=SR), x)
                   for hz, width_hz, db in TUBE_MODES)


def bamboo():
    """The flute: big splits, lesser slivers and a bed of tearing fibres."""
    slivers = small_breaks(FIBRE_CRUSH, snap_db=-1.5, tear_db=-5, ring_db=-2.5, length_s=.004,
                           ring_s=0.0047, low_hz=1000, high_hz=3200, weight_db=-9, spread_db=5, count=40)
    breaks = cracks([*BAMBOO_SPLITS, *slivers], BAMBOO_COLOUR, BAMBOO_WEIGHT_TINT, tear_per_s=520,
                    body_db=3, body_octaves=0.15, knock_db=0.5, under_db=-20.5, over_db=-10,
                    sweep=0.17, lag_s=.00002)
    splinters = grains(per_s=1500, cycles=7, glide=0)
    fibres = crackle(FIBRE_CRUSH, BAMBOO_COLOUR, splinters, PING_DB, low_db=-20.5, high_db=-1.5)
    return amp(-1.68) * tube(breaks + fibres)


def scene():
    """The flute, then the fruit, over the outdoor background."""
    flute, fruit = bamboo(), lychees()
    wet = echo(amp(-7.5) * flute + amp(-12.5) * fruit)
    crushing = flute + fruit + wet + push(flute) + collapse()
    return crushing + tyre() + grit() + birds() + outdoors()


def record(dry):
    """The sharpest peaks round off softly; then the band limit."""
    rounded = dry / (1 + abs(dry / CEILING) ** 3) ** (1 / 3)
    low_pass = signal.firwin(301, EDGE_HZ, window=("kaiser", 8), fs=SR)
    return signal.oaconvolve(rounded, low_pass[None], "same")


dry = scene()
out = record(dry)
waveform_to_disk(out)
```